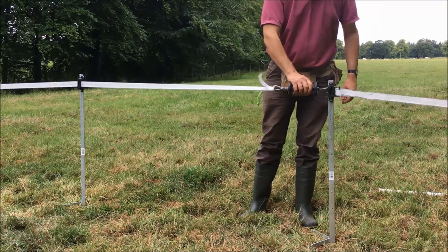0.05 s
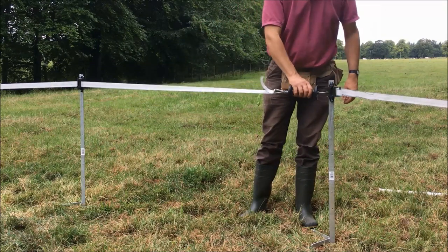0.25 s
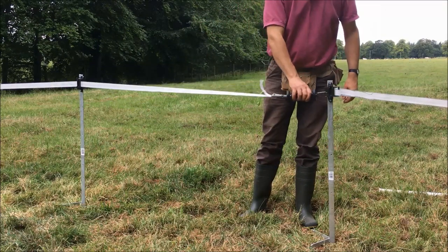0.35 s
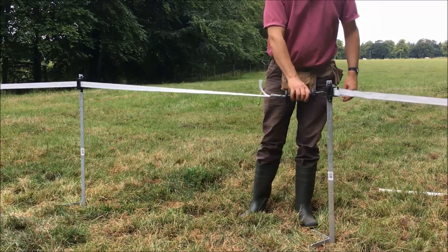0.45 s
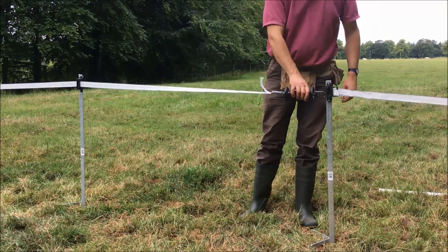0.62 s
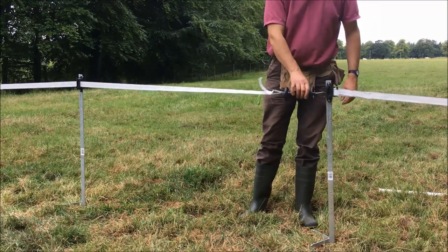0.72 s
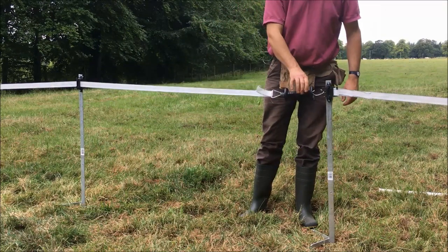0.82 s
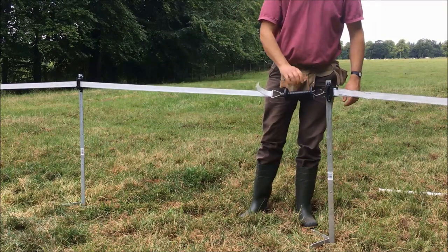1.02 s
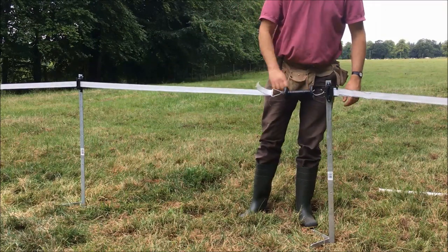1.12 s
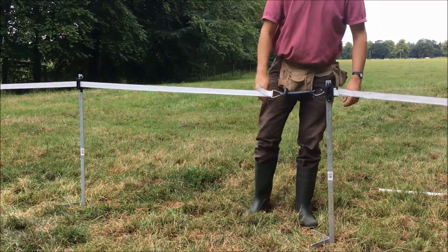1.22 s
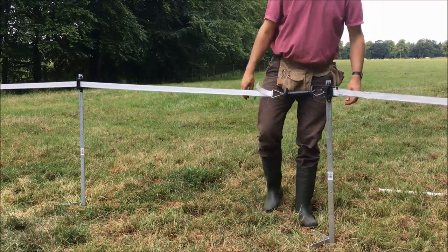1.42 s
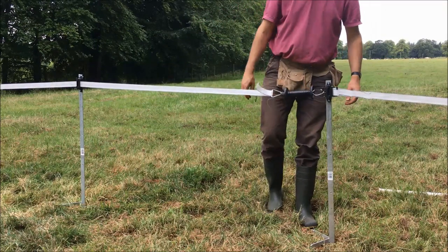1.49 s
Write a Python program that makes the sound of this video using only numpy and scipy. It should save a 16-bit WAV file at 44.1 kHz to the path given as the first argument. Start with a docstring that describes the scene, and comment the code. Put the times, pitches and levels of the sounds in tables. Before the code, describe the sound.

A gate handle's wire hook scrapes, then snaps onto a fence post in a field.

```python
"""Hooking a gate handle to a fence post

A wire hook scrapes on its fitting and rings in damped modes. The plastic handle snaps home with a thud
and a dying rattle, then settles with a smaller click. In the open field around it a bird twitters once
and a step brushes the grass, over faint air and a low, distant hum."""
import sys
import numpy as np
from scipy import signal
from scipy.fft import rfft, irfft
from scipy.io import wavfile
from scipy.ndimage import uniform_filter1d

SR = 44100
rng = np.random.default_rng(int(sys.argv[2]) if len(sys.argv) > 2 else 0)


def unload_wav(signal):
    """Save mono or channel-first audio to the path in sys.argv[1] as 16-bit WAV at rate SR, clipped to [-1, 1]."""
    wavfile.write(
        sys.argv[1],
        SR,
        np.round(np.clip(np.atleast_2d(signal).T, -1, 1) * 32767).astype(np.int16),
    )


N = 68355

# modes of the plastic latch, and of the handle on its seat: f/Hz, level/dB, T60/s
LATCH_MODES = [(935, -38, 0.066), (1050, -40, .03), (1455, -33, 0.035), (1704, -28.5, 0.018),
               (4132, -30, .022), (5240, -22, 0.012), (5595, -19, 0.018), (6115, -25, 0.025),
               (6670, -25.5, 0.02), (7010, -27, 0.028), (7470, -28.5, 0.017), (8690, -25, 0.013),
               (11060, -19, 0.008), (11510, -18, 0.009), (12960, -28.5, .014)]
SEAT_MODES = [(890, -44, 0.03), (1120, -39, 0.019), (1358, -30.5, 0.018), (2280, -42.5, 0.018),
              (3220, -46, 0.019), (4600, -40, 0.01), (5860, -40.5, 0.016), (6840, -25, 0.0091),
              (8500, -38, 0.011)]
# hook on fitting: t/s, scrape level/dB, scrape T60/s, rise/s, ring gain/dB, scrape tilt/(dB/octave)
TOUCHES = [(0.1883, -53.5, 0.067, 0.0013, -40.5, 4), (0.1958, -44.5, 0.05, 0.00042, -32, 5),
           (0.2004, -37, 0.024, 0.0011, -23.5, -2.5), (.2082, -34.5, 0.033, 0.0013, 2.5, -3.5),
           (0.2127, -34.5, 0.047, 0.00092, -12.5, -1.5), (.2220, -41, .035, 0.0014, -13, 0),
           (0.3145, -36, 0.042, 0.01, -17.5, -1.5), (0.3429, -40, 0.04, 0.001, -19.5, -3)]
# modes of hook and handle: f/Hz, relative level/dB, T60/s
HOOK_MODES = [(955, -50, 0.09), (1490, -27.5, 0.028), (1443, -49, .14), (1700, -43, .06), (2552, -49, 0.08),
              (3155, -43, .1), (3365, -51, 0.13), (4834, -54, 0.36), (4942, -50, 0.16), (5100, -41, .035),
              (5728, -54, .16), (6183, -50, 0.09), (9260, -59, .13), (9722, -55, 0.13)]
# hard contacts: t/s, level/dB, T60/s, tilt/(dB/octave)
CRACKS = [(0.2081, -30, 0.006, 2), (0.3480, -23, 0.018, 0), (0.3495, -29.5, 0.0099, -1),
          (0.3656, -38, 0.017, -3), (0.3834, -47, 0.011, -3), (0.4413, -36, 0.013, 0)]
# taps of the shank, and bumps of hand and clothing: t/s, f/Hz, level/dB, T60/s
KNOCKS = [(0.2005, 1777, -29, 0.017), (.3180, 1460, -39, .036)]
BUMPS = [(0.528, 1100, -56, 0.13), (0.925, 1350, -59.5, 0.08), (.952, 380, -59, .06),
         (1.195, 1150, -57.5, 0.095)]
# spectrum of a bump: f/(bump pitch), relative level/dB
BUMP_SPECTRUM = [(.12, -6), (.55, -10), (1, 0), (1.45, -16), (11, -32)]
# bursts of rattle: jolts of fitting and tape, and a faint shiver at the very start: t/s, level/dB, T60/s
RATTLES = [(.005, -70, .45), (0.213, -58.5, 0.38), (0.35, -37.5, 0.11), (0.38, -53.5, 0.34),
           (.444, -65.5, 0.28), (0.521, -66.5, 0.43)]
# contour of the bird's call: t/s, f/Hz, relative level/dB
TWITTER = [(.885, 3700, -10), (.889, 5250, -3), (.893, 4300, -12), (.900, 3700, -18), (.903, 3550, -1),
           (.907, 3600, 0), (.911, 5450, -5), (.914, 4900, -2), (.917, 3000, -9), (.924, 2900, -22),
           (.928, 4100, 0), (.933, 4150, -4), (.937, 5300, -4)]
# envelopes of the step and the hum: t/s, level/dB
STEP_LEVEL = [(1.18, -89), (1.28, -78), (1.33, -66.5), (1.375, -61), (1.45, -62), (1.50, -63.5),
              (1.55, -65)]
HUM_LEVEL = [(0, -61), (.7, -57), (1.05, -60.5), (1.27, -54), (1.55, -58)]
# spectral densities of the noise sources: f/Hz, relative level/dB
SCRAPE_SPECTRUM = [(250, -11), (600, -14), (1100, -9.5), (1600, -3), (2300, -3.5), (3300, -3.5),
                   (5500, -2.5), (8000, -8), (13000, -16), (16000, -28.5)]
CRACK_SPECTRUM = [(200, -29), (800, -24), (1500, 1), (2600, -6), (4000, -1.5), (6000, -1), (9800, -5),
                  (13000, -2), (16000, -8.5)]
RATTLE_SPECTRUM = [(150, -12), (550, -14), (950, -7), (1300, -2.5), (2400, -5.5), (3300, -3.5),
                   (6000, -1.5), (8000, -7.5), (12000, -15), (16000, -18.5)]
GRASS_SPECTRUM = [(600, -11), (1500, -2), (2500, -2.5), (4500, 1), (7500, 3.5), (10000, 1.5), (12500, 1.5),
                  (16000, -4.5)]
AIR_SPECTRUM = [(20, -39), (37, -18), (52, -4), (70, -5), (93, -8.5), (222, -21.5), (350, -18),
                (499, -23.5), (873, -22), (1610, -31), (4060, -38.5), (16000, -51)]


def handle(snap_s=.3481, settle_s=.4413, rise_s=.00031):
    """Impact excitation: the latch snaps, the hook pings, the post thuds, and the handle settles."""
    snap = ring(snap_s, LATCH_MODES, rise_s)
    ping = mode(snap_s, hz=9725, db=-41.5, t60=.1, rise=rise_s)
    thud = mode(snap_s + .0056, hz=180, db=-25.5, t60=.032, rise=.0033)
    return snap + ping + thud + ring(settle_s, SEAT_MODES, rise_s)


def hook():
    """Frictional excitation: each short scrape sets the loose hook ringing unevenly in its modes."""
    chatter = undb(3 * wander(rate_hz=220))
    sound = np.zeros(N)
    for start, db, t60, rise, ring_db, tilt_db in TOUCHES:
        sound += undb(db) * fade(start, rise, t60) * noise(SCRAPE_SPECTRUM, tilt_db)
        sound += undb(ring_db) * chatter * ring(start, HOOK_MODES, rise)
    return sound


def cracks():
    """Brief contact gives a broad spectrum: hard parts meet in bursts of noise, duller on the rebound."""
    return sum(undb(db) * fade(start, 0, t60) * noise(CRACK_SPECTRUM, tilt_db)
               for start, db, t60, tilt_db in CRACKS)


def knocks():
    """Heavy damping: the hand deadens the hook's shank as it taps the fitting."""
    return sum(mode(start, hz, db, t60, rise=.00081) for start, hz, db, t60 in KNOCKS)


def rattle():
    """Repeated collisions merge into rough noise: fitting and tape shiver after each jolt, and faintly from the
    very start."""
    shiver = noise(RATTLE_SPECTRUM) + undb(-11) * colour(ticks(per_s=1100), RATTLE_SPECTRUM)
    roughness = undb(1.5 * wander(rate_hz=440))
    envelope = sum(undb(db) * fade(start, .0026, t60) for start, db, t60 in RATTLES)
    return shiver / np.std(shiver) * roughness * envelope


def bumps():
    """Soft contact gives little treble: hand and clothing make muffled noise with a hollow pitch."""
    sound = np.zeros(N)
    for start, hz, db, t60 in BUMPS:
        spectrum = [(ratio * hz, level) for ratio, level in BUMP_SPECTRUM]
        sound += undb(db) * fade(start, .008, t60) * noise(spectrum)
    return sound


def bird(peak_db=-64.5):
    """Frequency modulation: a faint whistle swoops up three times."""
    t = since(0)
    times, hz, db = np.array(TWITTER).T
    envelope = np.interp(t, times, undb(peak_db + db), left=0, right=0)
    return envelope * tone(np.interp(t, times, hz))


def trees(x, echo_db=-1):
    """Scattering: foliage adds a short, diffuse tail to a sound."""
    tail = rng.standard_normal(N) * fade(0, rise=0, t60=.091)
    return x + undb(echo_db) * signal.fftconvolve(x, tail / np.linalg.norm(tail))[:N]


def grass():
    """Shot noise and friction: dry blades tick and slide along a boot."""
    times, db = np.array(STEP_LEVEL).T
    ticking = .57 * colour(ticks(per_s=1900), GRASS_SPECTRUM)
    sliding = .8 * noise(GRASS_SPECTRUM)
    return (ticking + sliding) * np.interp(since(0), times, undb(db), left=0)


def field(hum_hz=68.05, air_db=-59.5):
    """Ambient noise: broadband air flickers over a low tone that wavers like a far engine."""
    times, db = np.array(HUM_LEVEL).T
    pitch_hz = hum_hz * (1 + .022 * wander(rate_hz=10))
    hum = undb(np.interp(since(0), times, db)) * tone(pitch_hz)
    air = undb(air_db + .9 * wander(rate_hz=25)) * noise(AIR_SPECTRUM)
    return air + hum


def mode(start, hz, db, t60, rise):
    """Damped oscillation at a random phase; one period is added to the rise, so low modes build slowly."""
    phase = 2 * np.pi * rng.random()
    return undb(db) * fade(start, rise + 1 / hz, t60) * np.sin(2 * np.pi * hz * since(start) + phase)


def ring(start, modes, rise):
    """Modal superposition: one blow starts all the modes together."""
    return sum(mode(start, hz, db, t60, rise) for hz, db, t60 in modes)


def tone(hz):
    """Phase is the integral of frequency: a sine follows a changing pitch."""
    return np.sin(2 * np.pi * np.cumsum(hz) / SR)


def fade(start, rise, t60):
    """Exponential decay after a quick rise: 60 dB down in t60 seconds."""
    t = since(start)
    return (1 - np.exp(-t / max(rise, 1 / SR))) * np.exp(-np.log(1000) * t / t60)


def colour(x, spectrum, tilt_db=0):
    """Spectral shaping: x is filtered by a spectrum and a tilt per octave, then scaled to unit rms."""
    hz, db = np.array(spectrum).T
    octave = np.log2(np.maximum(np.fft.rfftfreq(N, 1 / SR), 1))
    knots = np.log2(hz)
    gain_db = np.interp(octave, knots, db) + tilt_db * np.clip(octave, knots[0], knots[-1])
    bass_rolloff = np.minimum(2 ** octave / hz[0], 1) ** 2
    y = irfft(rfft(x) * undb(gain_db) * bass_rolloff, N)
    return y / np.std(y)


def noise(spectrum, tilt_db=0):
    """Filtered Gaussian noise of unit rms."""
    return colour(rng.standard_normal(N), spectrum, tilt_db)


def ticks(per_s):
    """Poisson process: tiny impacts at random moments."""
    return (rng.random(N) < per_s / SR) * rng.standard_normal(N)


def wander(rate_hz):
    """Moving averages smooth noise into a drift of unit standard deviation."""
    width = max(int(SR / rate_hz), 1)
    drift = uniform_filter1d(rng.standard_normal(N), width, mode="wrap")
    drift = uniform_filter1d(drift, width, mode="wrap")
    return drift / np.std(drift)


def since(start):
    """Seconds since start, zero before it."""
    return np.maximum(np.arange(N) / SR - start, 0)


def undb(db):
    """Decibels to amplitude ratio."""
    return 10 ** (np.asarray(db) / 20)


def scene():
    """Linear superposition: the pressures of all sources add at one point."""
    gate = hook() + knocks() + cracks() + handle() + rattle() + bumps()
    return (gate + trees(bird()) + grass() + field())[None]


def record(dry, cutoff_hz=16000):
    """Band limiting: an elliptic low-pass filter removes the highest treble."""
    return signal.sosfilt(signal.ellip(8, .2, 70, cutoff_hz, fs=SR, output="sos"), dry)


dry = scene()
out = record(dry)
unload_wav(out)
```